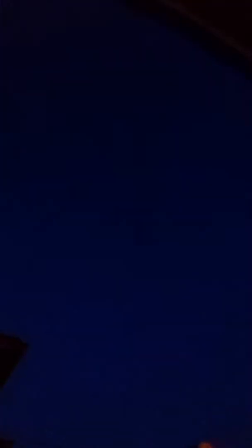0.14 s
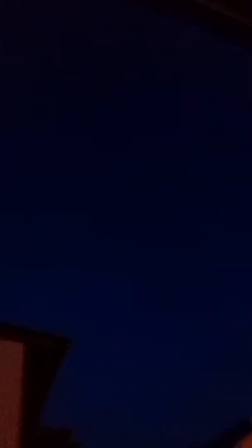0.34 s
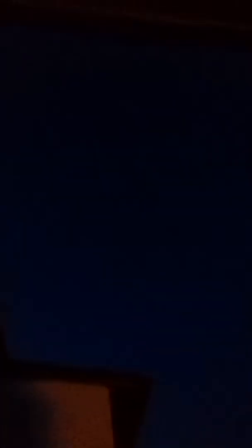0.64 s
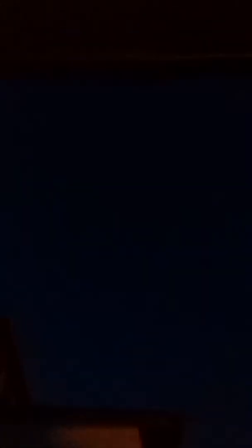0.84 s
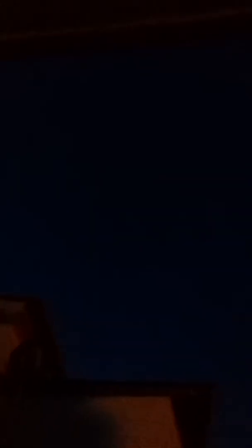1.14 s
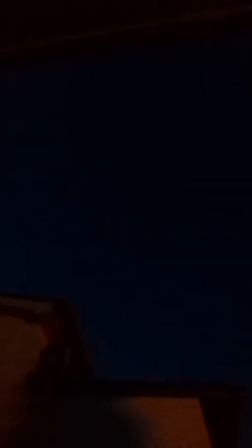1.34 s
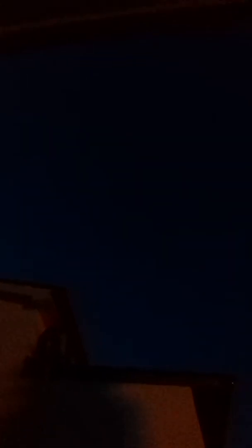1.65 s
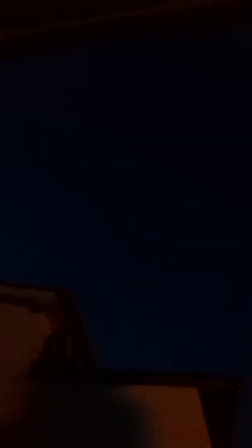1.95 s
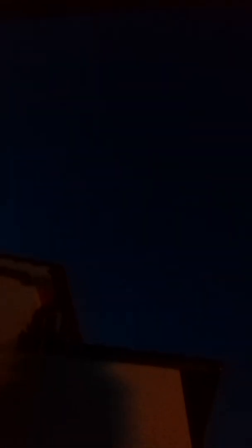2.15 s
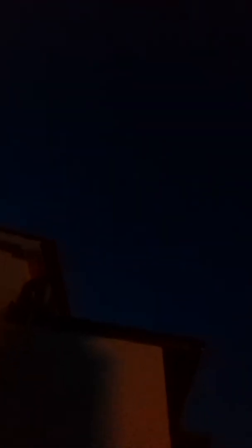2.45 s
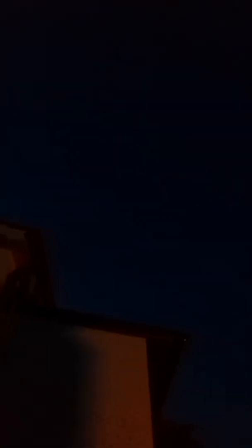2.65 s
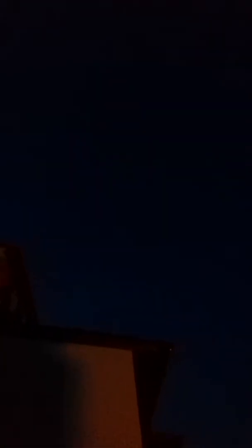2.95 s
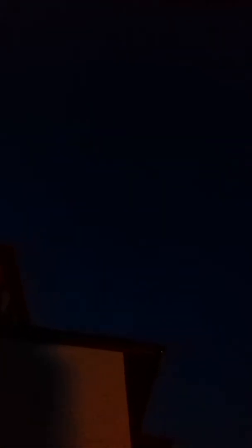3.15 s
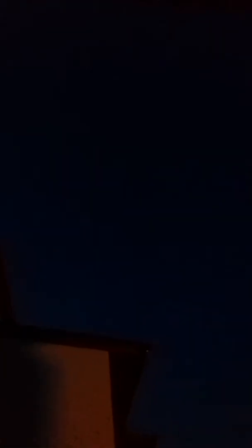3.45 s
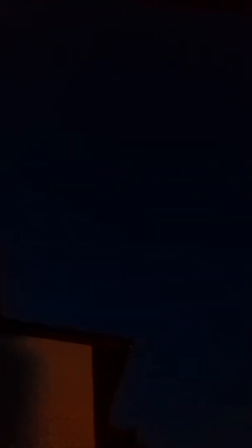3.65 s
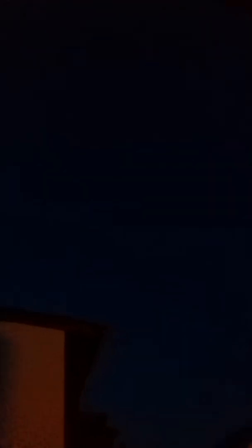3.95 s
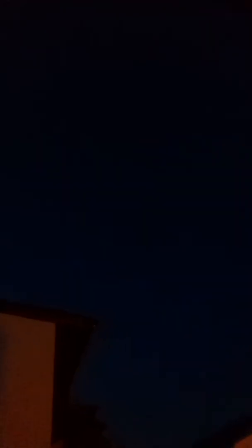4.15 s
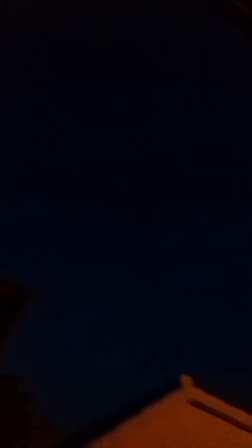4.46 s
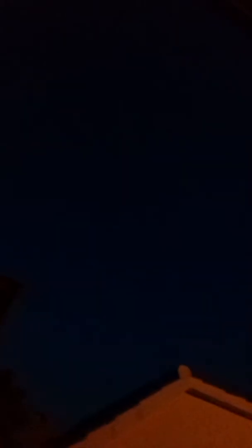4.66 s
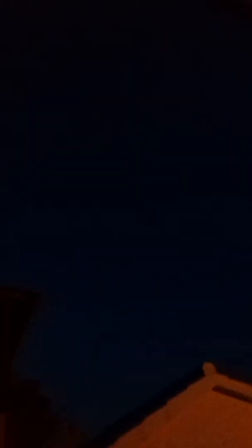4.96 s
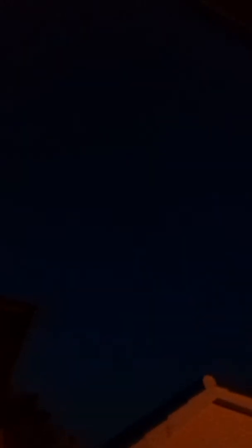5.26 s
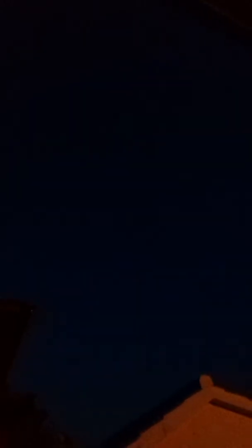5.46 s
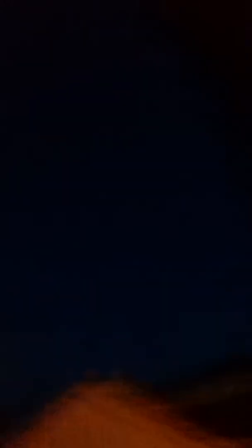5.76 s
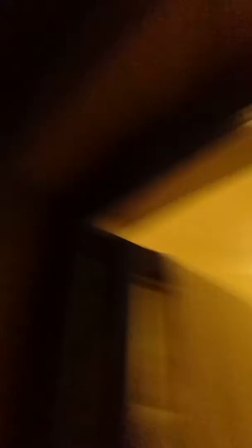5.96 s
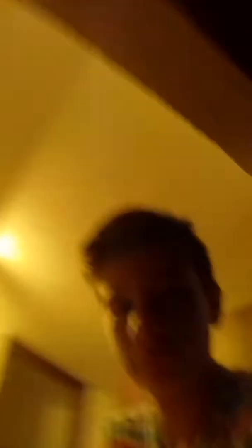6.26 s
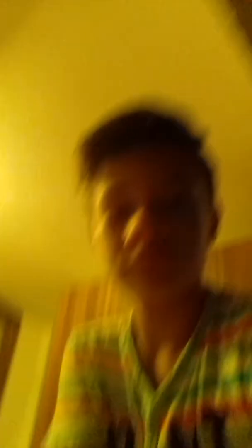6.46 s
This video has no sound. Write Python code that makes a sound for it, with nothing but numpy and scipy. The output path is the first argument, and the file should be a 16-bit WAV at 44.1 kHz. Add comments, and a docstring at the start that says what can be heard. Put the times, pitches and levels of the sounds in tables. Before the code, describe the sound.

In a quiet yard before sunrise, a near bird sings hurried strings of nasal twitters, dry rasps and gliding whistles. After a brief pause the song returns, with two bright piercing calls standing out, then thins away. Distant chirps blend faintly behind. One dull clap bounces off the walls late on, and fingers click on the hand-held microphone just before the end.

```python
"""A yard between house walls before sunrise: small birds sing gliding whistles, nasal twitters and dry rasps.
Whistles are gliding sines and reedy notes are harmonics shaped by throat and beak; both echo off the walls.
A flock of farther chirps, a faint outdoor hush, hiss and hum lie behind them.
Something claps once, a decaying noise burst; fingers tick on a hand-held case and brush it, as coloured noise."""
import sys
import numpy as np
from scipy import signal
from scipy.fft import rfft, irfft, next_fast_len
from scipy.io import wavfile
from scipy.ndimage import map_coordinates

SR = 44100
rng = np.random.default_rng(int(sys.argv[2]) if len(sys.argv) > 2 else 0)


def to_wav(s):
    """Save 16-bit WAV."""
    ch = np.atleast_2d(s).T  # columns
    pcm = np.round(np.clip(ch, -1, 1) * 32767)  # PCM
    wavfile.write(sys.argv[1], SR, pcm.astype(np.int16))


N = 291501


def amp(db):
    """Logarithmic level: decibels become an amplitude gain."""
    return 10 ** (np.asarray(db) / 20)


def unit(x):
    """Normalisation: scale a signal to rms 1."""
    return x / np.sqrt(np.mean(x ** 2) + 1e-20)


def along(points, hz):
    """Logarithmic frequency scale: interpolate (Hz, value) points on a log axis."""
    point_hz, value = np.transpose(points)
    return np.interp(np.log(hz + 1), np.log(point_hz + 1), value)


def curves(rows):
    """Slow modulation: one interpolated value per sample for each column after the time."""
    s, *columns = np.transpose(rows)
    return [np.interp(np.arange(N) / SR, s, column) for column in columns]


def wobble(rate, size):
    """Random modulation: a smooth curve through `rate` random knots a second."""
    knots = rng.standard_normal(size=1024)
    return map_coordinates(knots, [np.arange(size) * rate / SR], mode="mirror")


def filtered(x, response):
    """Linear filtering: multiply the spectrum of x by a response of frequency."""
    n = x.shape[-1]
    m = next_fast_len(n + SR // 20)
    spectrum = rfft(x, m) * response(np.fft.rfftfreq(m, 1 / SR))
    return irfft(spectrum, m)[..., :n]


def noise(spectrum):
    """Spectral shaping: white noise coloured by a spectrum, then set to rms 1."""
    return unit(filtered(rng.standard_normal(N), lambda hz: amp(along(spectrum, hz))))


def add(track, s, sound):
    """Superposition: mix a sound into a track at time s, cut at the track's ends."""
    i = round(s * SR)
    part = sound[max(-i, 0):max(N - i, 0)]
    track[max(i, 0):max(i, 0) + len(part)] += part


def swell(u, edge):
    """Amplitude envelope over a note (u from 0 to 1): it grows gently and ends a little faster."""
    return np.abs(np.sin(np.pi * u ** 1.2)) ** edge


# The birds' vocabulary: the pure notes of each syllable, always in the same order.
# Columns: delay_s, length_s, start_hz, middle_hz, end_hz, relative_level_db
PURE_NOTES = { "slur": [(0.002, .052, 4020, 3830, 3450, 1)], "sigh": [(0, 0.0383, 2400, 2030, 1820, -1)],
              "lilt": [(0.0046, 0.035, 2330, 2530, 2630, 3.5)], "call": [(0, .05, 4390, 4274, 4225, -4),
              (.029, .04, 4322, 4167, 3710, 3.5)], "pip": [(0.0033, 0.032, 3840, 3850, 3850, 1.5)],
              "buzz": [(.006, .04, 2742, 3040, 3470, -6.5)],
              "drop": [(0.0059, 0.041, 3350, 2980, 2650, 1.5)],
              "tsip": [(0.0032, 0.0255, 4200, 4060, 4140, 1)]}
# The reedy notes of each syllable; roughness runs from 0 to 1.
# Columns: delay_s, length_s, start_pitch_hz, end_pitch_hz, throat_resonance_hz, relative_level_db, roughness
REEDY_NOTES = { "slur": [(.008, .045, 676, 611, 2980, -17, .8)],
               "chur": [(.003, .062, 424.7, 534, 2940, 1.5, .85)],
               "call": [(.06, .05, 558.5, 600, 3650, -9, 1)],
               "buzz": [(0, 0.042, 905, 1090, 4300, 1.5, 0.7)],
               "drop": [(.028, .04, 1420, 1311, 4760, -3, 0.58)],
               "rasp": [(0.0015, 0.0422, 490, 440, 3560, -1, 0.87)],
               "zip": [(0, .05, 680, 862.4, 3040, -8.5, .3), (.028, .052, 442.1, 571.2, 3580, 1.5, 0.89)],
               "mew": [(0, .075, 570, 745, 2760, 0.5, .2)],
               "peep": [(0.00036, 0.0824, 760, 930, 3770, -1.5, 0.13)],
               "nasal": [(0.001, .045, 690, 790, 3560, 1.5, 0.61)],
               "whine": [(0, .055, 660, 784.3, 3240, -0.5, 0.6), (.048, 0.053, 1191, 1233, 3520, 2, 0.12)],
               "chatter": [(0, .04, 690, 735, 3080, -7, .55), (.008, .035, 1272, 1310, 4950, -6.5, 0.37),
               (.056, .058, 660, 705, 4080, 0, .5), (.11, 0.0521, 849, 873, 4200, 1, 0.47),
               (.222, .038, 1505, 1348, 3440, -3, 0.21), (.272, .055, 525, 575, 3650, -1.5, .45)]}
# The song: which syllable is sung when; the ratio transposes its notes.
# Columns: start_s, syllable, pitch_ratio, relative_level_db
SONG = [ (-.05, "zip", 1.08, -41), (.129, "mew", 1.0, -49), (.178, "whine", .99, -44),
        (.314, "chatter", 1.01, -45.5), (.372, "tsip", 1.0, -46.5), (.533, "sigh", .77, -63),
        (.537, "sigh", 1.5, -47.5), (0.548, "tsip", 1.02, -45), (1.125, "tsip", 1.0, -59.5),
        (1.22, "slur", 1.06, -59), (1.472, "slur", 1.034, -42.5), (1.536, "lilt", 1.09, -54),
        (1.646, "buzz", 0.95, -46), (1.781, "drop", 1.11, -49.5), (1.817, "nasal", 1.18, -49.5),
        (1.824, "lilt", 1.04, -55), (1.852, "pip", 0.86, -43.5), (1.855, "rasp", 1.1, -41),
        (1.948, "zip", 0.97, -42.5), (1.99, "pip", 0.86, -46), (2.108, "slur", 1, -42.5),
        (2.11, "sigh", 0.94, -58.5), (2.155, "sigh", 1.46, -50), (2.186, "lilt", 1.01, -55.5),
        (2.186, "chur", 1.1, -48), (2.303, "call", 1.0, -32.5), (2.37, "pip", 1.0, -29),
        (2.476, "buzz", 1.0, -45), (2.621, "drop", 1.035, -48.5), (2.69, "rasp", 0.95, -38.5),
        (2.695, "pip", 0.93, -41), (2.798, "zip", 0.93, -41.5), (2.978, "nasal", 1.018, -54),
        (3.0, "mew", 0.74, -52.5), (3.042, "nasal", 1.13, -47), (3.098, "nasal", 1.38, -44.5),
        (3.11, "pip", 1.06, -45.5), (3.23, "sigh", 0.99, -56), (3.232, "slur", 1.01, -48),
        (3.28, "mew", 1.05, -53), (3.317, "lilt", 1.03, -55), (3.322, "chur", 0.9, -54),
        (3.413, "call", 0.99, -34), (3.488, "pip", 0.92, -34), (3.574, "buzz", 0.94, -45),
        (3.684, "pip", 0.93, -47), (3.706, "drop", 1, -52.5), (3.748, "zip", 1.4, -44),
        (3.886, "zip", 1.17, -40.5), (4.044, "pip", 0.91, -51), (4.1, "mew", .81, -51),
        (4.138, "whine", 1.03, -46), (4.271, "chatter", .985, -43.5), (4.503, "tsip", 1.02, -46.5),
        (4.589, "tsip", 1.03, -49), (4.688, "nasal", 1.02, -51.5), (4.762, "nasal", 0.81, -53),
        (4.845, "nasal", 0.86, -59), (5.026, "buzz", .9, -54), (5.031, "pip", 0.99, -46.5),
        (5.18, "nasal", 1.18, -56.5), (5.282, "nasal", 1.35, -50), (5.3, "pip", 1.25, -62),
        (5.329, "lilt", 1.006, -55.5), (5.442, "peep", 1.0, -48), (5.49, "pip", 0.93, -48),
        (5.537, "nasal", 1.0, -58), (5.764, "nasal", 0.9358, -63), (5.835, "pip", 0.86, -63.5)]
THROAT_FOLLOWS = 0.24  # the throat resonance rises as this power of a syllable's pitch ratio


def near_birds():
    """Superposition: each syllable strings pure and reedy notes together at its own pitch and strength."""
    pure, reedy = np.zeros(N), np.zeros(N)
    for s, syllable, ratio, db in SONG:
        for delay, length, start, middle, end, note_db in PURE_NOTES.get(syllable, []):
            note = whistle(length, ratio * start, ratio * middle, ratio * end, waver=0.025, edge=0.85)
            add(pure, s + delay, amp(db + note_db) * note)
        for delay, length, start, end, throat_hz, note_db, rough in REEDY_NOTES.get(syllable, []):
            sung_throat_hz = throat_hz * ratio ** THROAT_FOLLOWS
            note = twitter(length, ratio * start, ratio * end, sung_throat_hz, rough,
                           width_hz=326, jitter=0.0531, flutter_db=5.5)
            add(reedy, s + delay, amp(db + note_db) * note)
    return amp(0.33) * pure + amp(0.24) * reedy


def whistle(length, start, middle, end, waver, edge):
    """Frequency modulation: a sine glides through three pitches, starts pure and breaks into a fast warble."""
    u = np.linspace(0, 1, int(length * SR))
    # a parabola through the three pitches
    hz = start * (1 - u) * (1 - 2 * u) + middle * 2 * u * (2 - 2 * u) + end * u * (2 * u - 1)
    # steep glides are the least steady
    unsteady = (waver + .16 * abs(np.log(end / start))) * u
    warbled_hz = hz * (1 + unsteady * wobble(510, len(u)))
    phase = 2 * np.pi * np.cumsum(warbled_hz) / SR
    tone = np.sin(phase) + amp(-56.0) * np.sin(2 * phase)  # with a trace of octave
    return unit(swell(u, edge) * tone)


# How the beak colours the reedy notes.
# Columns: frequency_hz, gain_db
BEAK = [(500, -18), (1500, -10.5), (2500, -3.5), (4200, 4.5), (4800, -1.5), (5500, -9), (6500, -20),
        (8000, -49.5), (12000, -61)]


def twitter(length, start, end, throat_hz, rough, width_hz, jitter, flutter_db):
    """Source and filter: syrinx harmonics pass throat and beak; uneven vibration smears them into a rasp."""
    u = np.linspace(0, 1, int(length * SR))
    glide = start + (end - start) * u
    pitch = glide * (1 + (0.0082 + jitter * rough) * wobble(449.6, len(u)))
    harmonic = np.arange(1, 19)[:, None]
    # the throat opens and closes with the pitch
    resonance_hz = throat_hz * (glide / glide.mean()) ** 0.28
    gain = 1 / np.sqrt(1 + ((harmonic * glide - resonance_hz) / width_hz) ** 2)
    cycles = harmonic * np.cumsum(pitch) / SR + rng.random(harmonic.shape)
    voice = (gain * np.sin(2 * np.pi * cycles)).sum(0)
    flutter = amp(flutter_db * rough * wobble(389, len(u)))
    return unit(filtered(voice * flutter * swell(u, 0.56), lambda hz: amp(along(BEAK, hz))))


def far_chirps(count=420):
    """Overlapping sources: many short chirps, scattered in time, pitch and strength, merge into a flock."""
    flock = np.zeros(N)
    for i, (when, pitch, glide, size) in enumerate(rng.standard_normal((count, 4))):
        hz = 3900 * np.exp(.085 * pitch)
        start, end = hz * (1 + 0.0622 * glide), hz * (1 - 0.08 * glide)
        chirp = whistle(.035, start, hz, end, waver=0.041, edge=0.69)
        s = max(i + 0.35 * when, 0) / count * N / SR
        add(flock, s, amp(1.3 * size) * chirp)
    return unit(flock)


# The changing loudness of the far birds.
# Columns: time_s, level_db
FLOCK = [(0, -65), (.6, -46), (.8, -87), (1.1, -84), (1.3, -66.5), (5.5, -55), (5.75, -66), (6.61, -63)]


def far_birds():
    """Direct-to-reverberant ratio: stronger echoes than the near song's, under a changing level."""
    echoing = yard(far_chirps(), walls_db=-27.5, tail_db=-15.5)
    return amp(curves(FLOCK)[0]) * unit(echoing)


# Reverberation time of the yard's decaying tail, the time to fall by 60 dB.
# Columns: frequency_hz, t60_s
YARD = [(300, 0.25), (2000, 0.85), (4000, 0.9), (7000, 0.12), (14000, .2)]


def yard(x, walls_db, tail_db):
    """Reverberation: direct sound, an early decaying tail, and a dense cluster of wall echoes around 22 ms."""
    hz, t, grain = signal.stft(rng.standard_normal(SR), SR, nperseg=256)
    walls = amp(walls_db) * np.exp(-((t - .022) / .018) ** 2)
    decay = amp(tail_db - 60 * t / along(YARD, hz)[:, None])
    tail = decay * (1 - np.exp(-t / 0.0041))  # builds up within a few ms
    echoes = signal.istft(grain * (walls + tail), SR, nperseg=256)[1]
    mixed = x + signal.fftconvolve(x, echoes)[:N]
    return mixed / np.sqrt(1 + np.sum(echoes ** 2))


# The colour of the clap.
# Columns: frequency_hz, relative_spectrum_level_db
CLAP = [(88, -58), (150, -31), (247, -44), (402, -5), (489, -15.5), (614, 4), (672, -5), (938, 3),
        (1040, -2.5), (1550, 4), (2970, -2), (3900, 5), (5610, -19), (7290, -38), (12300, -120)]


def clap(attack=.0006, s=4.899, db=-42.0, fade=0.053, crack_db=0, tail_db=-19):
    """Impulsive excitation: one sharp noise crack, a burst of wall echoes and a faint tail (times in s)."""
    t = np.maximum(np.arange(N) / SR - s, 0)
    burst = np.exp(-(t / fade) ** 2 / 2)
    crack = amp(crack_db - 60 * t / 0.002)
    tail = amp(tail_db - 60 * t / 1.2)
    onset = 1 - np.exp(-t / attack)  # silent until s
    return amp(db) * onset * (burst + crack + tail) * noise(CLAP)


# Finger ticks on the case.
# Columns: start_s, length_s, level_db
TICKS = [(0.241, 0.0029, -56), (0.282, 0.0023945, -50.5), (.779, 0.0023, -46), (6.059, 0.006, -56),
         (6.152, .0035, -53.5), (6.209, 0.022, -53.5), (6.2142, 0.0033, -39.5), (6.2188, 0.0036, -40.5)]
# The colour of the case when struck, before its low body is added.
# Columns: frequency_hz, relative_level_db
CASE = [(300, -22), (700, 12.5), (2500, -1.5), (4000, 8.5), (5500, -11), (9000, -13.5), (12000, -35),
        (15500, -24)]
# level of a full knock (dB), its low body (dB), dB of body lost per dB softer
KNOCK_DB, BODY_DB, BODY_GROWS = -27, 4.5, 1.3


def handling():
    """Contact noise: fingers tick on a hand-held case, harder ones with more body, and brush it once."""
    track = np.zeros(N)
    for s, length, db in TICKS:
        u = np.linspace(0, 1, int(length * SR))
        body_db = BODY_DB + BODY_GROWS * min(db - KNOCK_DB, 0)

        def case_response(hz):
            """Resonant body: the case's colour with a low shelf set by the strength of the tick."""
            return amp(along(CASE, hz) + body_db / (1 + (hz / 2200) ** 4))

        grit = filtered(rng.standard_normal(size=2048), case_response)
        add(track, s, amp(db) * unit(grit[:len(u)] * swell(u, 0.9735)))
    stroke = np.exp(-((np.arange(N) / SR - 6.085) / 0.023) ** 2)
    brush_colour = [(3000, -13), (6000, -3), (9000, 9), (11000, -17), (15000, -6.0)]  # (Hz, dB)
    return track + amp(-69.0) * stroke * noise(brush_colour)


# The slow drift of hush and hiss.
# Columns: time_s, relative_hush_level_db, relative_hiss_level_db
AIR = [(0.0, -70, -76.5), (0.55, -66.5, -76), (0.83, -72, -80), (1.44, -72, -81.5), (1.99, -68.5, -76.5),
       (2.58, -69.5, -76), (3.09, -67.5, -77.5), (3.33, -68.5, -77.5), (4.49, -66, -77),
       (5.89, -71.5, -80.5), (6.61, -69, -79.5)]
# The colour of the outdoor hush.
# Columns: frequency_hz, relative_spectrum_level_db
HUSH = [(25, -1.5), (60, -3.5), (200, -1.5), (350, -0.5), (650, 3.5), (1200, 2.5), (2200, 2), (4000, -7.5),
        (6000, -12.5), (10000, -31.5)]
# The colour of the fine hiss.
# Columns: frequency_hz, relative_spectrum_level_db
HISS = [(2000, -30), (5000, 4), (8500, 4.5), (10500, 3.5), (15500, 3)]


def background():
    """Interchannel coherence: hush nearly alike on both sides, a central hum and a fine unrelated hiss."""
    hush_db, hiss_db = curves(AIR)
    # what differs between the sides: (Hz, dB)
    width_gain = [(30, -18), (70, -11), (150, -8.5), (1000, -4.5), (4000, -6.5)]
    width = filtered(noise(HUSH), lambda hz: amp(along(width_gain, hz)))
    hush = amp(hush_db + 2.5) * (noise(HUSH) + np.array([width, -width]))
    hiss = amp(hiss_db + 7.5) * np.array([noise(HISS), noise(HISS)])
    # a 114 Hz tone, slightly unsteady in level and phase
    hum_phase = 2 * np.pi * 114 * np.arange(N) / SR + .6 * wobble(1.7, N)
    hum = amp(-84.0 + 1.4 * wobble(3.16, N)) * np.sin(hum_phase)
    return hush + hiss + hum


def scene():
    """Superposition: birds, clap and ticks sit in the middle; only the background has width."""
    song = yard(near_birds(), walls_db=-38, tail_db=-38.5)
    return song + far_birds() + clap() + handling() + background()


TOP_HZ = 15750


def record(dry):
    """Band limiting: nothing at or above the top frequency passes."""
    return filtered(dry, lambda hz: hz < TOP_HZ)


dry = scene()
out = record(dry)
to_wav(out)
```